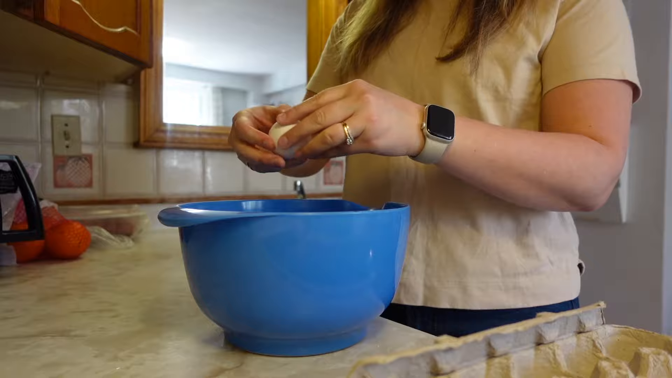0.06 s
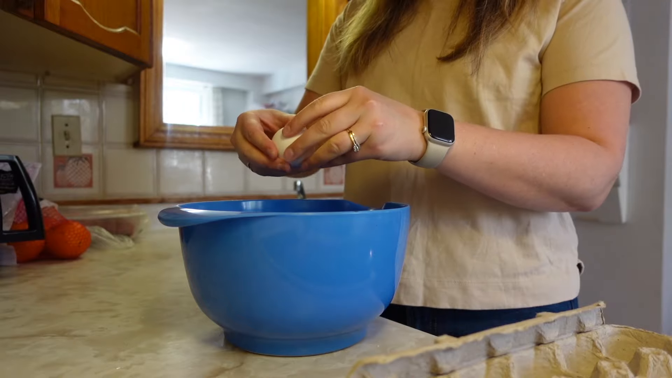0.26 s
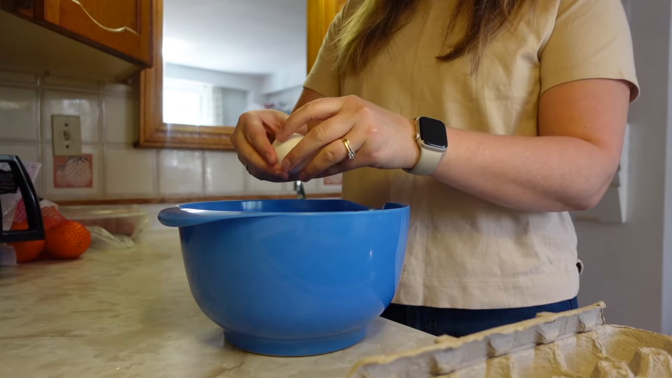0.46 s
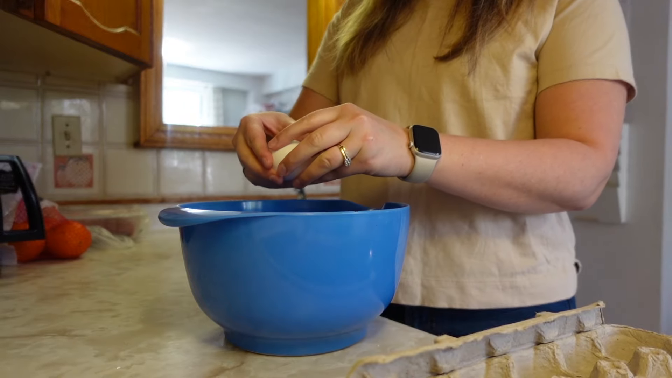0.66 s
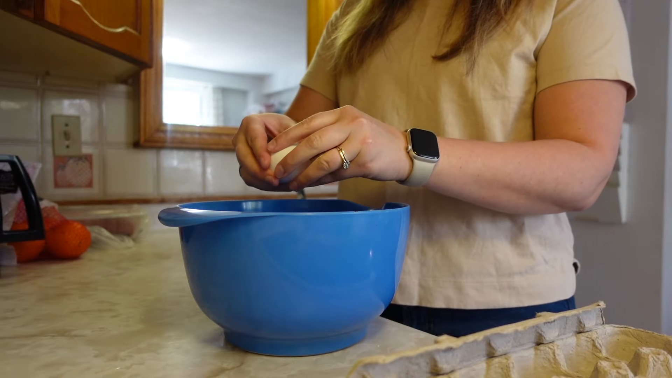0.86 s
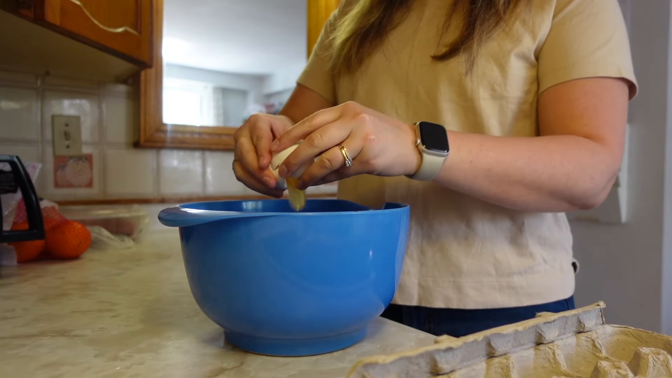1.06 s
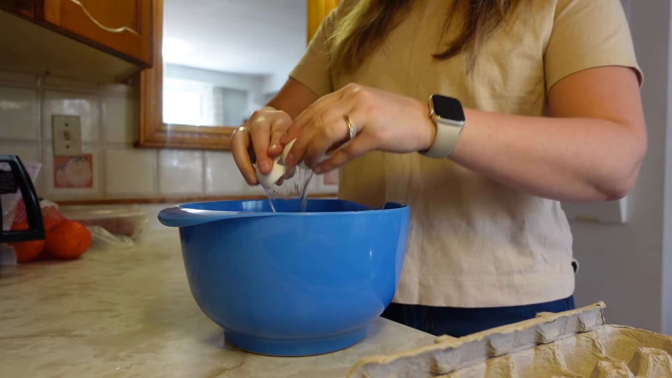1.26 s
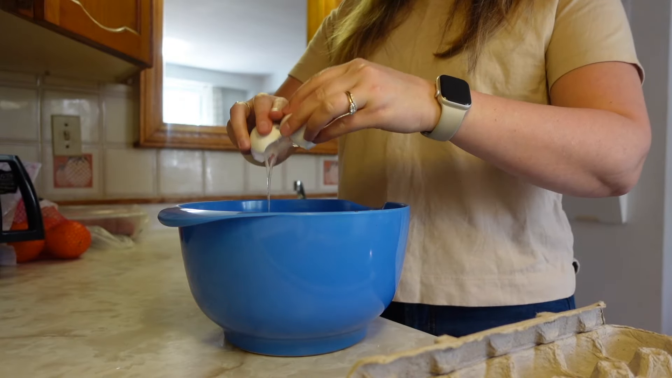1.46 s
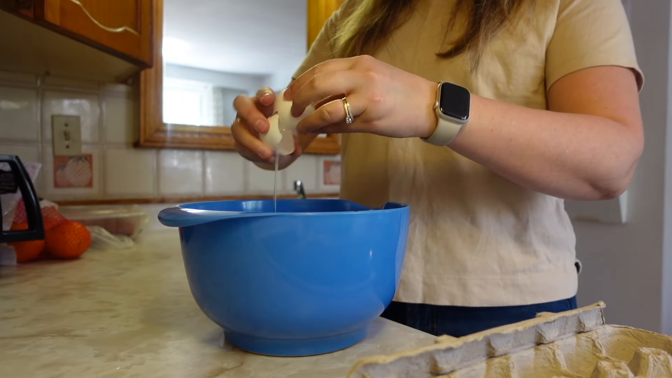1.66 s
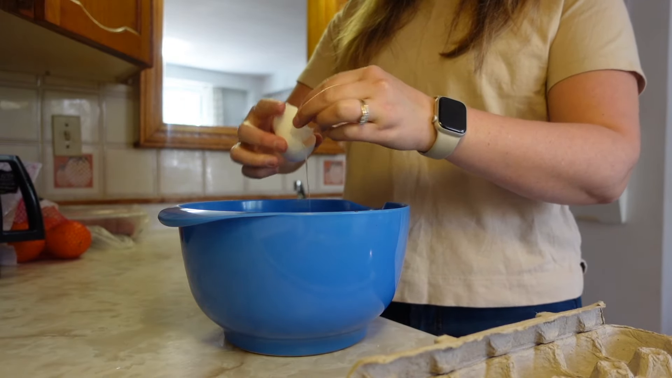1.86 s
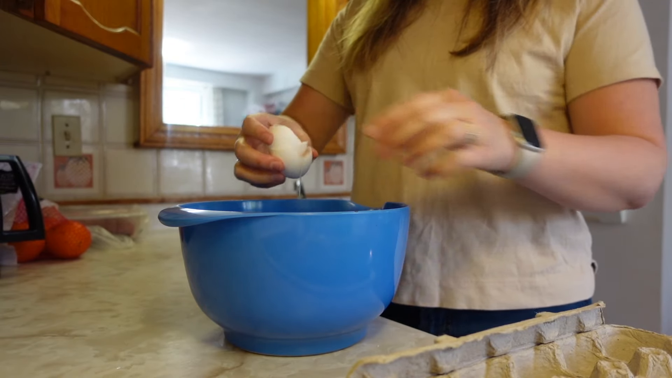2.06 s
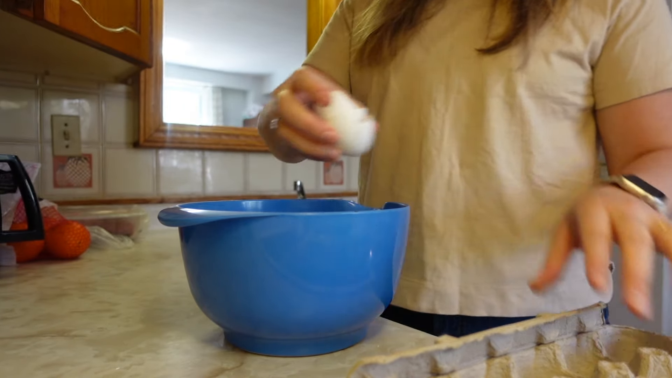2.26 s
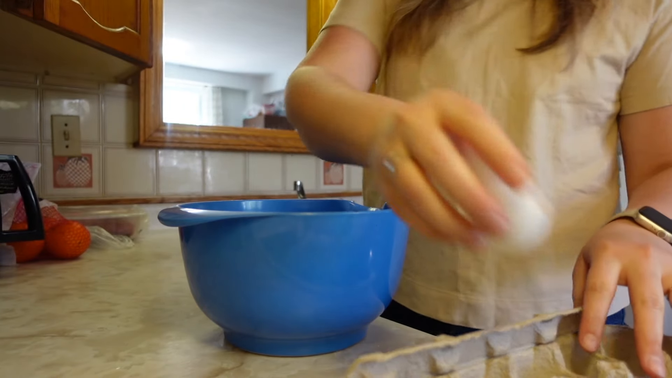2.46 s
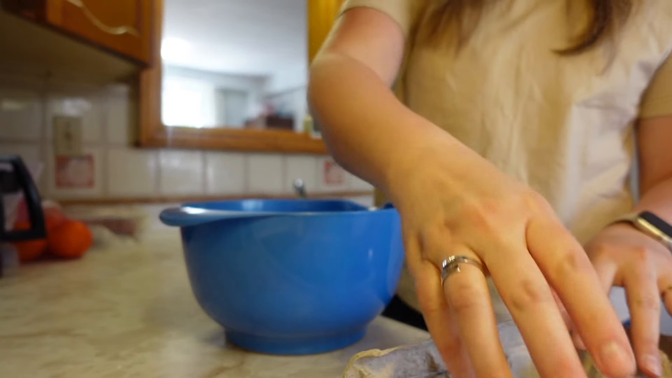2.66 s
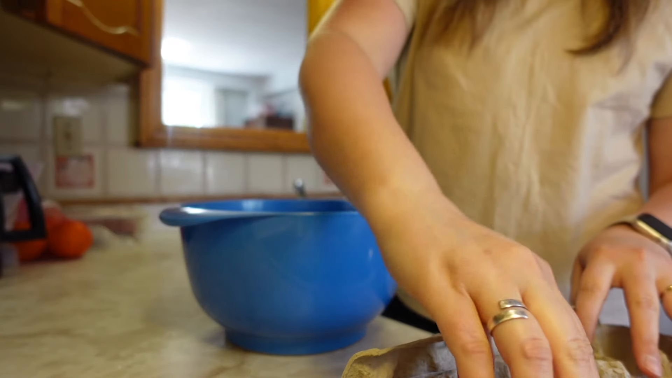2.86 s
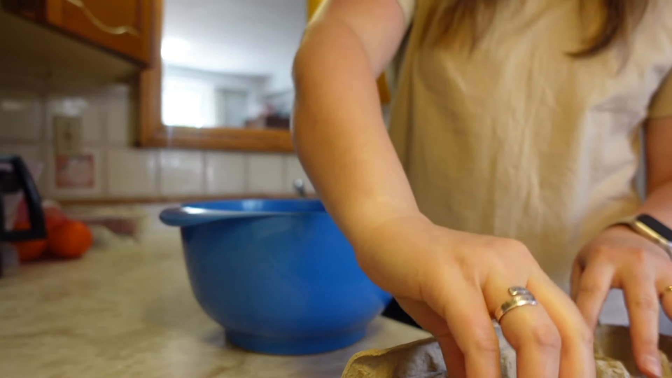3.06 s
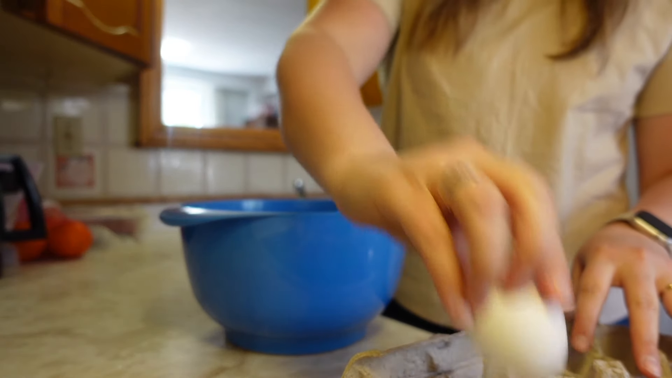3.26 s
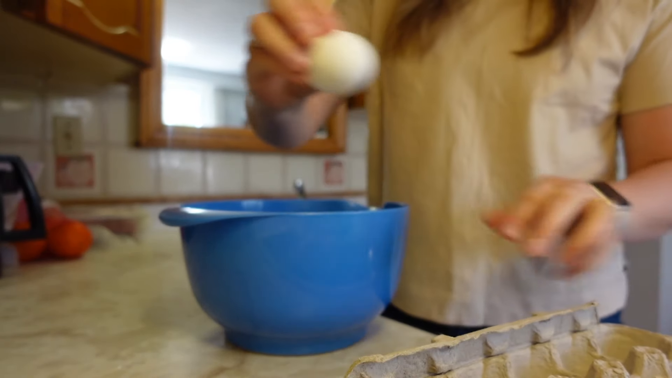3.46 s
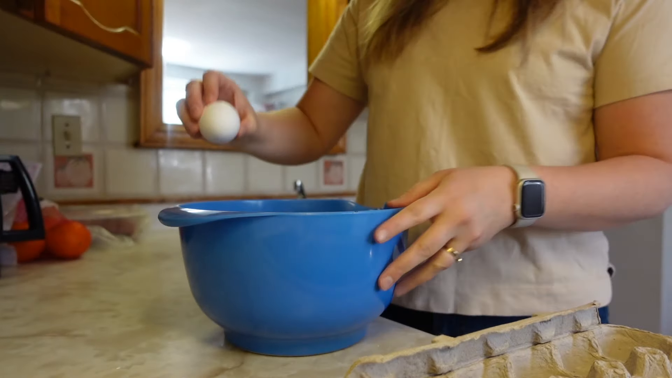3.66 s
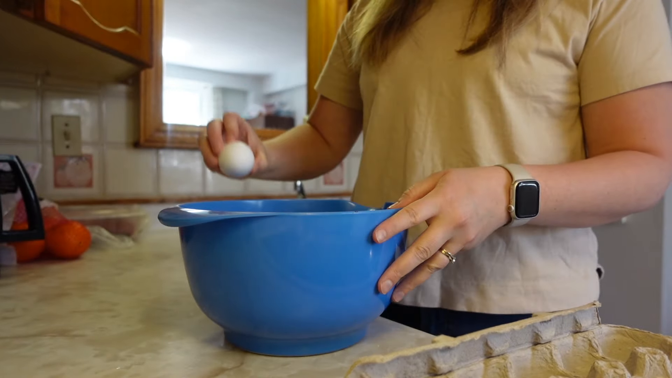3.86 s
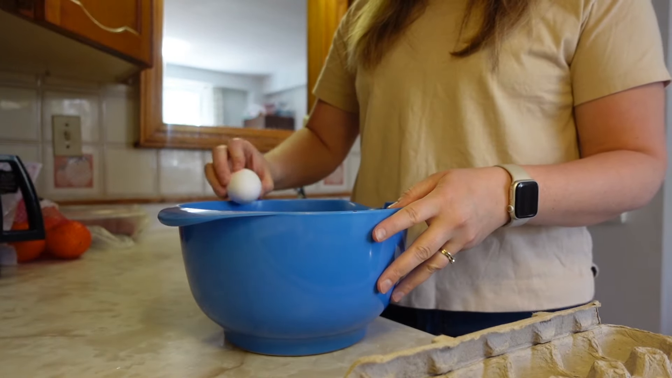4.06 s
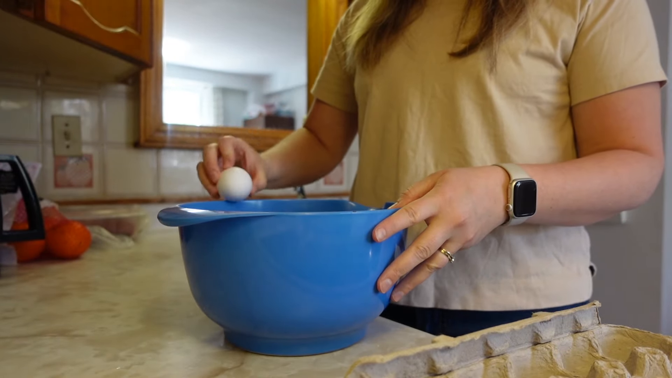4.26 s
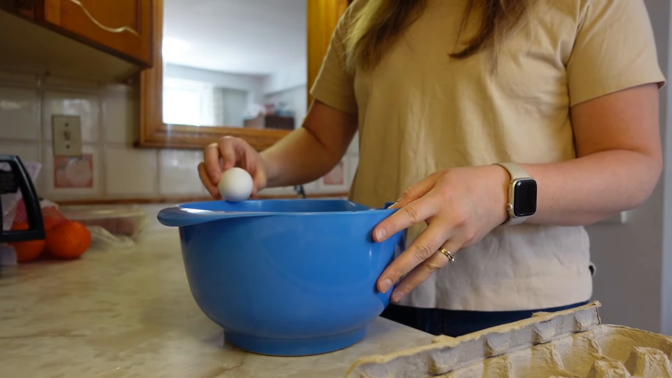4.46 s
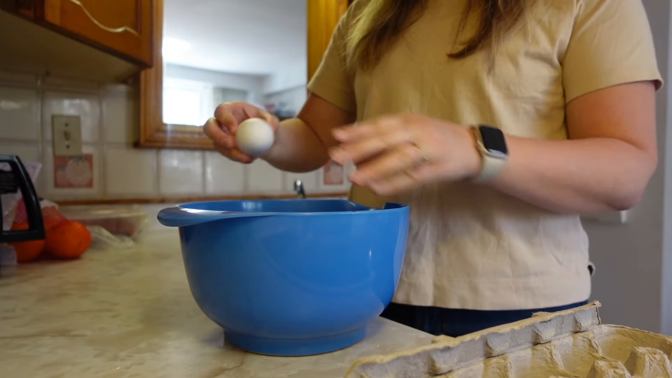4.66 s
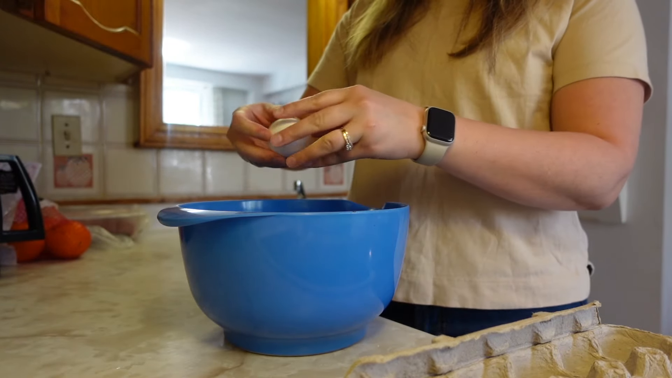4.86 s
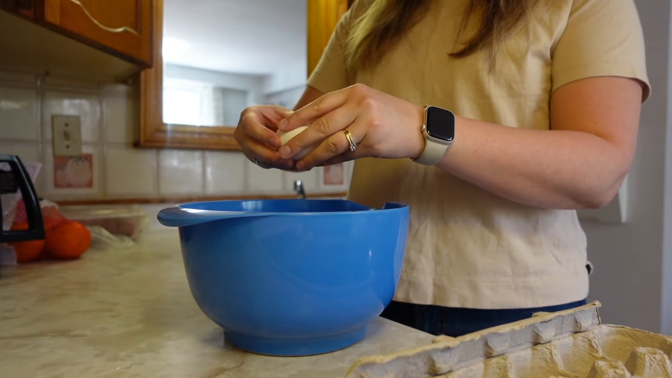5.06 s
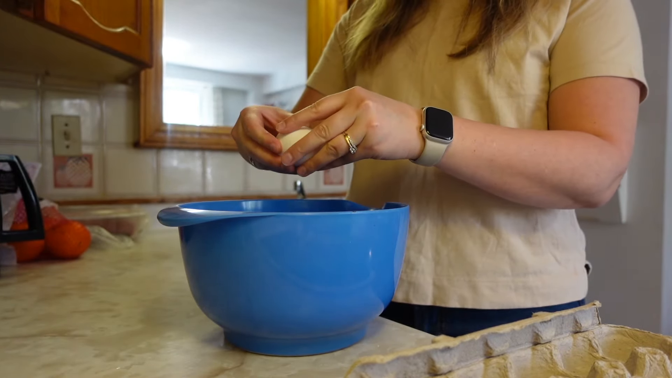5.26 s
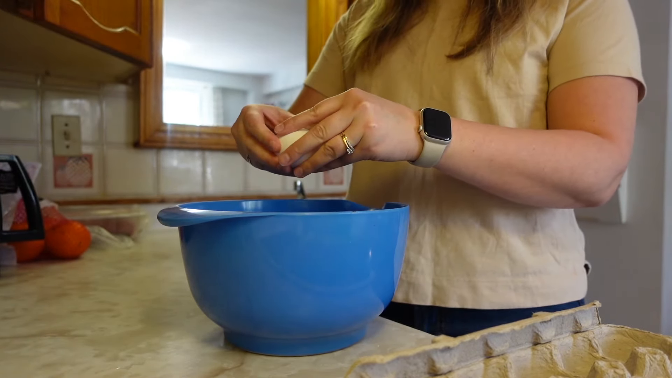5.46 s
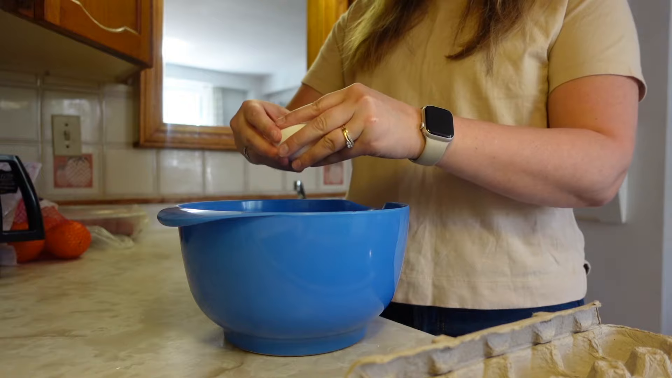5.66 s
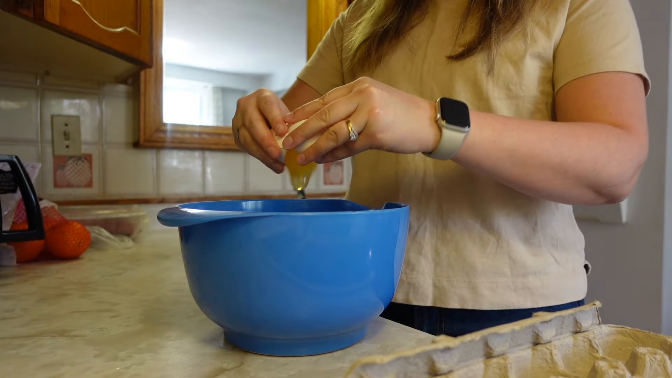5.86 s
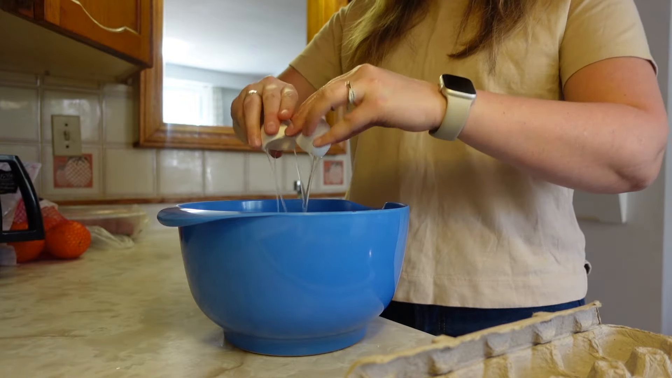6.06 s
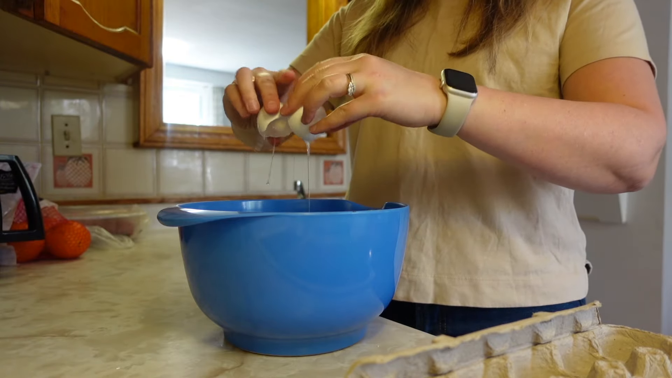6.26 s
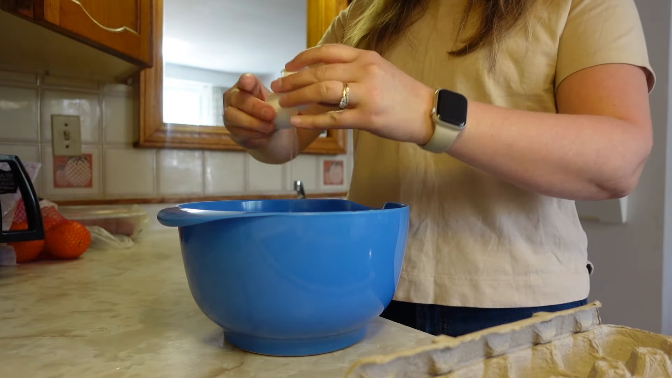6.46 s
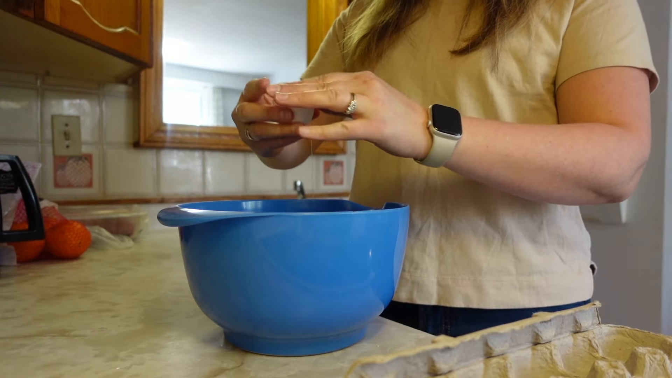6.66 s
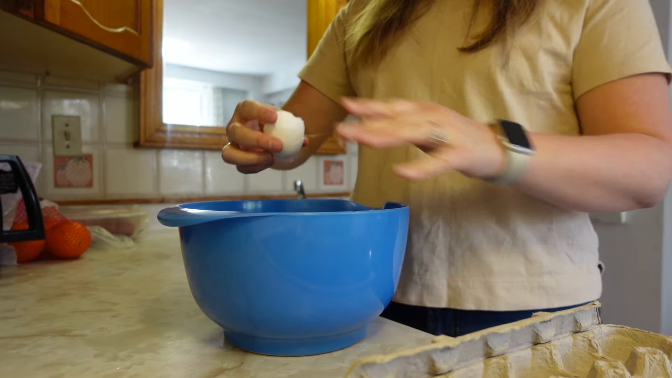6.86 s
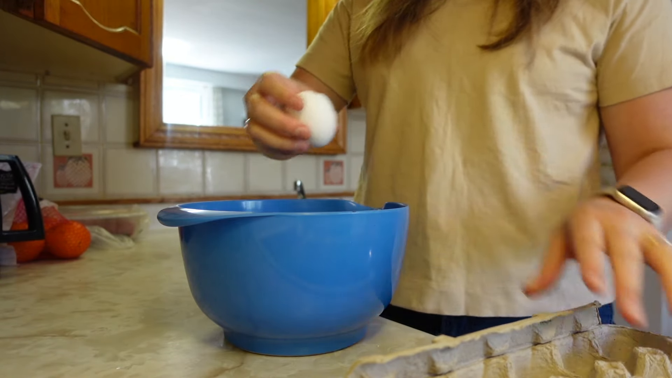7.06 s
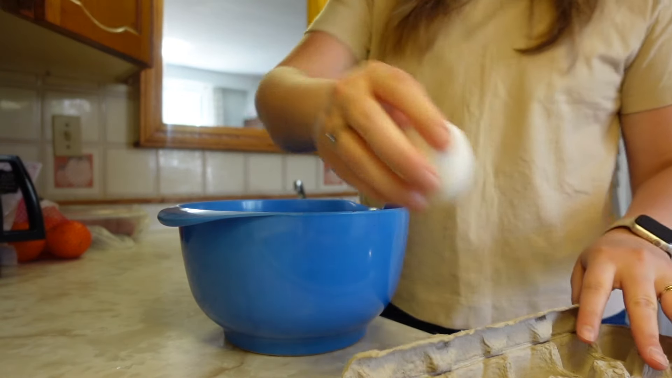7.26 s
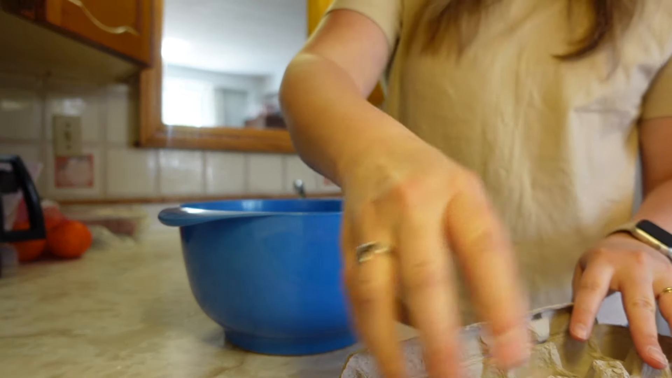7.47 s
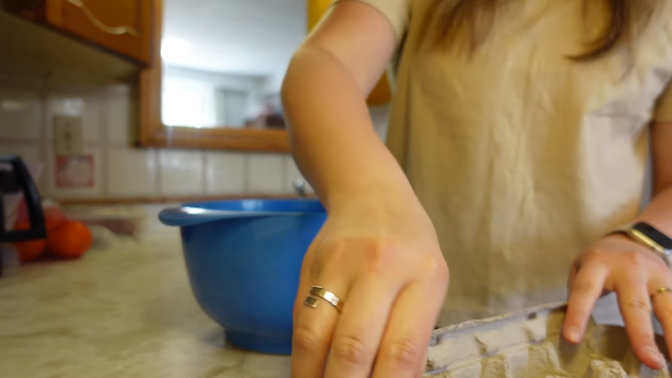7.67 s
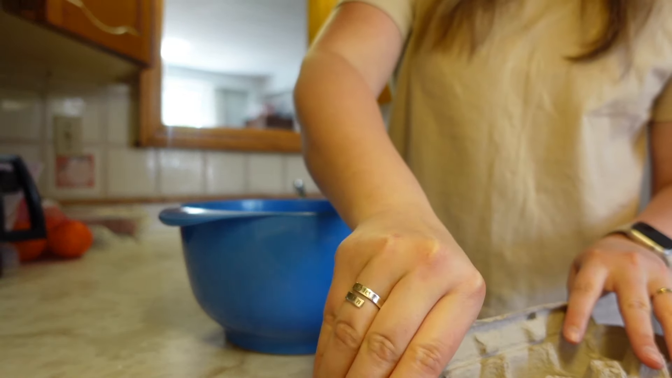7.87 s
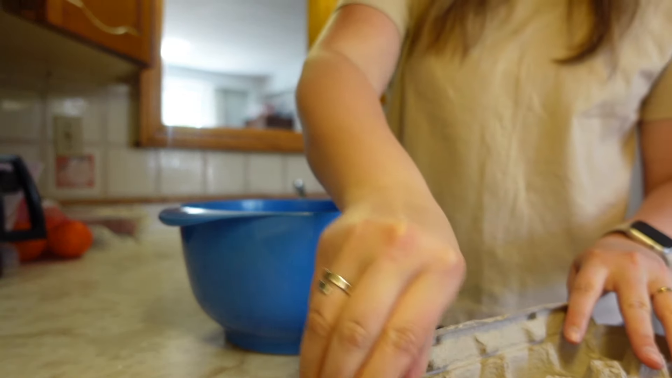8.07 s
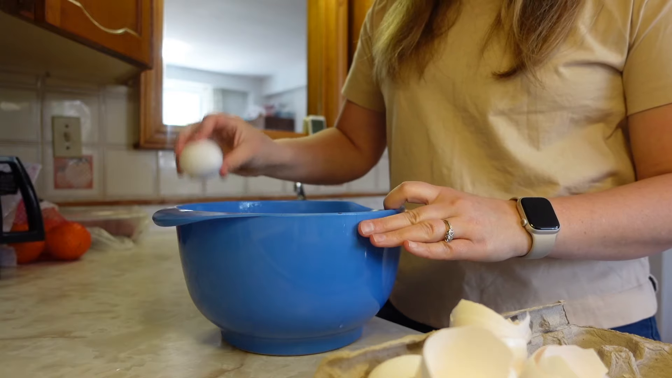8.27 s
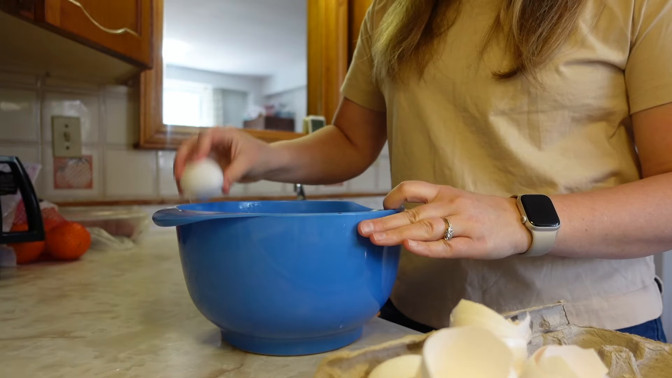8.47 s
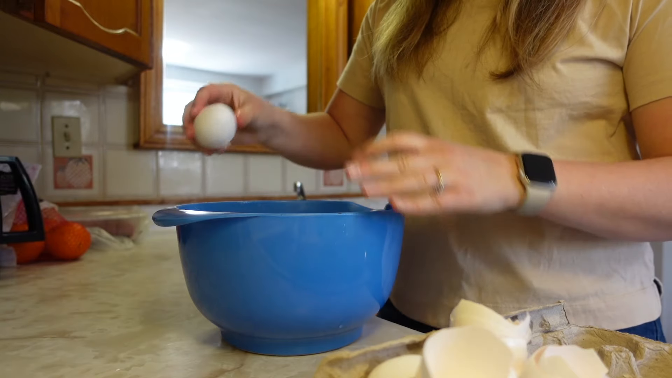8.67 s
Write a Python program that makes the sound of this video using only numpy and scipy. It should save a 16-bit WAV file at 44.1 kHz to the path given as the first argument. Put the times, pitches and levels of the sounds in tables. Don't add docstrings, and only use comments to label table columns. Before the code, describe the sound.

Close stereo sound of eggs being cracked in a hard-walled kitchen. Shell snaps and crunches apart with tiny wet pops, then drops into a pulp carton with dull knocks and fibrous rubbing. Three firm taps on a plastic bowl rim follow, and another egg is split with brittle crackles. Its shell lands in the carton, and the next egg is knocked on the rim. A low fridge hum runs underneath.

```python
import sys
import numpy as np
from scipy import signal
from scipy.fft import rfft, irfft, next_fast_len
from scipy.io import wavfile
from scipy.ndimage import uniform_filter1d, map_coordinates

SR = 44100
rng = np.random.default_rng(int(sys.argv[2]) if len(sys.argv) > 2 else 0)


def volts_from_decibels(level):
    exponent = np.asarray(level, float) / 20
    return 10 ** exponent


def unload_audio(sound):
    columns = np.transpose(np.atleast_2d(sound))
    steps = np.round(np.clip(columns, -1, 1) * 32767)
    wavfile.write(sys.argv[1], SR, steps.astype(np.int16))


N = 384111
SPAN = 3 * 2 ** 13
HZ = np.fft.rfftfreq(SPAN, 1 / SR)

# frequency in Hz, time to fall 60 dB in seconds.
KITCHEN_DECAY = [(100, 0.44), (500, 0.43), (1500, 0.56), (4000, 0.46), (8000, 0.39), (14000, 0.29)]
# frequency in Hz, left-right likeness [0-1].
ECHO_ALIKE = [(200, 1), (600, 0.95), (1600, 0.76), (5000, 0.72), (15000, 0.53)]

# frequency in Hz, level in dB rms.
MOTOR_LINES = [(60, -77), (120, -50.5), (150, -50), (249, -57), (469, -65.5)]
# frequency in Hz, level in dB per Hz.
DRONE_COLOUR = [(20, -40.5), (50, -25.5), (86, -19), (108, -15.5), (135, -5), (172, -6.5), (197, 0.5),
                (228, -3), (262, -3), (291, -12.5), (364, -8), (430, -15.5), (480, -19.5), (520, -25),
                (900, -61.5)]
# frequency in Hz, level in dB per Hz.
HISS_COLOUR = [(290, -39), (500, -5.5), (822, -10), (1020, -5.5), (1450, -17), (1790, -12), (2130, -18),
               (3020, -18.5), (3550, -19), (10500, -25), (16500, -34.5)]
# frequency in Hz, left-right likeness [0-1].
HISS_ALIKE = [(500, 0.17), (1600, 0.041), (5000, 0.093), (15000, 0.66)]
# start in seconds, length in seconds, frequency in Hz, level in dB.
RINGS = [(0, .44, 2930, -64), (0, .36, 2200, -69), (.08, .14, 5150, -69), (.07, .25, 5850, -71),
         (.6, .3, 1720, -65), (3.52, .13, 4800, -74), (8.112, .03, 5300, -63), (8.172, .055, 1980, -60),
         (8.14, .05, 740, -59), (6.15, .28, 1720, -60), (5.945, .17, 2820, -49), (3.385, .07, 4300, -66),
         (1.336, .08, 1030, -50)]

# start in seconds, peak in dB, hollow ring in dB, crumble in seconds.
SNAPS = [(0.4447, -27, -42.5, 0.043), (0.4936, -14, -48, 0.042), (0.9234, -14, -32.5, 0.05),
         (0.941, -15, -40, 0.054), (1.0318, -9.5, -32, 0.12), (1.0587, -6.5, -39, 0.013),
         (1.061, -18, -27, 0.08), (1.1459, -42, -28, 0.088), (1.1699, -19.5, -37, 0.045),
         (1.2744, -13, -46, 0.028), (1.3304, -21, -26.5, .047), (1.372, -20, -34.5, 0.053),
         (1.4374, -25.5, -54, 0.023), (1.6276, -22, -32.5, 0.046), (1.6893, -29, -30, 0.051),
         (1.709, -16.5, -27.5, 0.061), (1.7551, -16, -31, 0.082), (1.8193, -25.5, -33, .058),
         (1.855, -23.5, -32.5, .028), (5.7424, -16, -32, 0.14), (5.7887, -28, -34.5, 0.032),
         (5.881, -32, -59, .041), (5.9387, -19, -36, 0.03), (6.097, -31, -44, 0.047),
         (6.2348, -29, -48, .059), (6.2576, -20.5, -44, 0.058), (6.281, -21, -39, .044),
         (6.4446, -39, -52, 0.037), (6.4672, -44, -51, 0.038), (6.5265, -29, -42, 0.11)]
# start in seconds, peak in dB, hollow ring in dB, crumble in seconds.
CRUSHES = [(0.8774, -47, -75, .15), (1.51, -40, -44, 0.057), (1.5235, -29, -36, 0.18),
           (1.537, -22, -40, 0.074), (1.56, -21, -34.5, 0.04), (1.591, -18, -40, .03),
           (1.6654, -46, -40, 0.015), (1.722, -20.5, -38, .021), (1.884, -36, -44, 0.033),
           (1.9228, -36, -43, 0.028), (2.034, -29.5, -44, 0.087), (6.082, -48, -49, 0.044),
           (6.115, -26, -38, 0.074), (6.1926, -24.5, -43, 0.028), (6.205, -43, -41, 0.034),
           (6.2897, -17, -46, .04), (6.3035, -23, -36, 0.047), (6.5102, -32, -44, 0.046),
           (6.535, -41, -41, 0.6), (6.6175, -27.5, -38, 0.075), (6.6425, -19, -40, 0.049),
           (6.658, -25, -48, .032), (6.8694, -49, -55, 0.083)]
# start in seconds, hollow half shell in Hz, flake in Hz.
BREAK_PITCHES = [(0.4447, 3070, 8730), (0.4936, 2970, 7780), (0.8774, 1740, 9180), (0.9234, 3030, 9300),
                 (0.941, 2680, 3680), (1.0318, 1960, 6060), (1.059, 1730, 6580), (1.1459, 1720, 5900),
                 (1.1699, 1920, 6840), (1.2744, 1710, 6520), (1.3304, 1690, 3480), (1.372, 1770, 6600),
                 (1.4374, 2470, 5900), (1.5235, 2550, 6350), (1.537, 2340, 6230), (1.56, 2010, 3460),
                 (1.5911, 3070, 7040), (1.6276, 2320, 3640), (1.6654, 2030, 7530), (1.6903, 2000, 6570),
                 (1.709, 2320, 6490), (1.722, 2380, 9890), (1.7551, 2330, 6520), (1.8193, 2150, 6450),
                 (1.855, 2330, 3550), (1.884, 2310, 5960), (1.9228, 2360, 5780), (2.036, 2360, 8660),
                 (5.7424, 3080, 6020), (5.7887, 3220, 7010), (5.881, 3090, 4940), (5.9387, 2800, 3700),
                 (6.082, 2820, 3810), (6.097, 2820, 4930), (6.115, 2630, 10400), (6.1926, 1580, 6550),
                 (6.205, 3250, 3310), (6.2348, 1700, 7560), (6.2576, 3110, 6370), (6.281, 3110, 6400),
                 (6.2895, 3130, 6460), (6.3037, 2860, 6340), (6.4446, 2590, 6130), (6.4672, 2330, 8410),
                 (6.5104, 1870, 6470), (6.5265, 2160, 6050), (6.5676, 2930, 3330), (6.6172, 2250, 5600),
                 (6.6425, 1880, 8950), (6.6582, 2220, 8630), (6.8694, 1980, 6400)]
# start in seconds, peak in dB.
TICKS = [(0.391, -55), (0.4334, -41), (0.6174, -43), (0.6574, -48.5), (0.7003, -45), (1.235, -55),
         (4.9561, -50), (5.0799, -49), (5.0898, -47), (5.2704, -47.5), (5.414, -43.5), (5.455, -47),
         (5.5892, -51.5), (5.6568, -43.5), (5.713, -46), (6.9404, -61.5), (.477, -41), (5.728, -38)]
# start in seconds, peak in dB, frequency in Hz, width in Hz.
POPS = [(.5, -42.5, 513, 80), (.93, -26, 2840, 120), (1.332, -33.5, 1083, 121), (1.345, -33, 1360, 200),
        (5.932, -24, 3500, 450), (5.94, -28, 2806, 70), (6.2, -41.5, 1640, 121.5), (6.12, -40, 1900, 250),
        (6.646, -31, 1892, 170), (1.036, -26, 6200, 600), (1.274, -23, 5400, 1200),
        (1.33, -25.5, 5060, 600), (1.33, -33, 3500, 600), (1.535, -37, 2390, 250), (1.54, -36, 4300, 600),
        (1.562, -33, 3420, 250), (1.59, -35.5, 1750, 300), (1.545, -38.5, 1490, 250),
        (1.855, -39, 3530, 250), (5.94, -26, 3950, 350), (6.08, -43, 1750, 200), (6.203, -32.5, 3220, 200),
        (6.203, -40, 4100, 250), (6.255, -45, 1770, 250), (6.292, -36.5, 3120, 150),
        (6.305, -42, 3500, 180), (6.3, -49, 4430, 300), (6.3, -42, 1730, 250), (6.846, -37, 9250, 1500),
        (2.662, -25.5, 2300, 200), (2.679, -20.5, 750, 160), (7.528, -23, 5300, 700),
        (7.536, -22, 6300, 900), (7.583, -22.5, 2800, 350), (7.585, -17.5, 5300, 700)]
# frequency in Hz, level in dB per Hz.
SHELL_COLOUR = [(410, -50), (700, -19), (1200, -18), (3000, -11), (3850, -6), (6370, -2.5), (12200, -3.5),
                (15400, -10), (16500, -47)]

# time in seconds, pressure in dB.
PRISING = [
    [(.85, -61), (.93, -43), (1.1, -40.5), (1.21, -45), (1.4, -60), (1.72, -49), (1.77, -53), (1.9, -66),
     (2.15, -61)],
    [(5.6, -90), (5.72, -56), (5.91, -44.5), (5.96, -50), (6.16, -63), (6.32, -74), (6.5, -50), (6.57, -48),
     (7, -69.5)],
]
# time in seconds, pitch in Hz.
CAVITY_PITCH = [
    [(.93, 2980), (1.06, 1830), (1.15, 1710), (1.37, 1790), (1.44, 1410), (1.55, 2426), (1.63, 2310),
     (1.69, 2010), (1.76, 2284)],
    [(5.74, 3350), (5.94, 3460), (6.08, 2780), (6.13, 3350), (6.3, 3150), (6.46, 2400), (6.51, 2030),
     (6.57, 2510), (6.65, 1950)],
]
# start in seconds, hold in seconds, fade in seconds per 20 dB,
# level in dB, dull over bright in dB.
RUBS = [(2.406, 0.02, 0.17, -56.5, 4.5), (2.47, 0.0084, 1.5, -65.5, -1), (2.973, 0.068, 0.15, -41.5, -2.5),
        (3.078, 0.039, 0.16, -50.5, -5.5), (3.172, 0.039, 0.11, -50.5, -3), (3.35, 0.0082, 0.12, -53, 1.5),
        (3.391, 0.012, 0.01, -53, 0), (3.429, .01, 0.44, -66.5, 2), (3.719, 0.016, 0.02, -51, -25),
        (7.221, .005, 0.26, -59.5, 1), (7.638, .005, 0.12, -53.5, 15), (7.731, 0.062, 0.06, -41.5, -10),
        (7.831, 0.11, .03, -39.5, -3.5), (7.97, .02, 0.27, -57, 3), (8.053, .005, 0.06, -54.5, -6),
        (8.136, 0.0047, 0, -56.5, -8)]

# start in seconds, peak in dB, bright part in dB, crumble in seconds.
DROPS = [
    (2.6571, -11, -4, 0.047),
    (2.678, -10.5, -9.5, 0.033),
    (2.885, -48, 8.5, 0.073),
    (7.514, -9.5, -12.5, 0.062),
    (7.528, -20, -1, 0.089),
    (7.581, -21, -1.5, 0.051),
    (7.603, -16.5, 0.5, 0.028),
    (7.646, -15, -9.5, 0.037),
    (8.004, -36, -14, 0.041),
    (8.131, -49, -8, 0.048),
]
# frequency in Hz, width in Hz, level in dB.
CUPS = [
    (1690, 380, -8.5),
    (944, 200, 1.5),
]
# frequency in Hz, level in dB per Hz.
PULP_COLOUR = [(150, -57), (250, -1.5), (628, -2.5), (749, 0), (1080, -0.5), (1160, -3.5), (1720, 1.5),
               (2160, -6.5), (2600, -11.5), (3380, -19), (7000, -45)]
# frequency in Hz, level in dB per Hz.
FIBRE_COLOUR = [(1180, -36.5), (2000, -5), (2770, -7.5), (3480, -2.5), (4090, -7.5), (4920, -4),
                (13300, -15), (16100, -24), (16500, -53)]
# start in seconds, length in seconds, peak in dB,
# frequency in Hz, width in Hz.
CHAFES = [(2.972, .09, -34.5, 3480, 350), (2.985, .065, -35, 1950, 130), (2.99, .07, -42.5, 7080, 150),
          (3.07, .07, -40, 3480, 250), (3.07, .055, -43.5, 6850, 350), (3.08, .06, -48, 1920, 250),
          (3.163, .07, -42.5, 5650, 180), (3.168, .065, -45, 3370, 300), (3.168, .065, -43, 1650, 300),
          (3.385, .035, -43, 1650, 200), (7.725, .055, -35, 1900, 300), (7.735, .045, -38, 3200, 298),
          (7.735, .045, -38, 5300, 300), (7.82, .03, -37, 3830, 200), (7.87, .085, -34.5, 4250, 700),
          (7.905, .048, -34.5, 3400, 250), (7.85, .1, -34, 1280, 200), (7.905, .045, -36, 7100, 900)]

# start in seconds, peak in dB, bowl body in dB, rattle in seconds, rise in seconds.
KNOCKS = [
    (4.0892, -7.5, -14.5, 0.062, 0.0021),
    (4.2842, -9, -20, 0.045, 0.003),
    (4.466, -4, -32.5, 0.019, 0.0011),
    (8.3482, -8, -21.5, 0.2, 0.00027),
    (8.39, -13.5, -30, .06, .006),
    (8.526, -7.5, -29, 0.059, 0.0044),
    (8.563, -15.5, -31, 0.042, .004),
]
# frequency in Hz, level in dB per Hz.
RIM_COLOUR = [(760, -55.5), (1300, -14), (1900, -10.5), (2450, -12), (3000, -2.5), (4000, -3.5), (5000, -5),
              (7000, -5), (15200, -18), (16000, -38.5), (16500, -57)]
# frequency in Hz, level in dB per Hz.
BOWL_COLOUR = [(160, -26.5), (280, -4), (389, -4.5), (466, -3.5), (630, -11.5), (852, -13.5), (961, -7),
               (1050, -10), (1490, -18.5), (2200, -24), (2860, -27), (4840, -120)]
# frequency in Hz, width in Hz, level in dB.
RIM_SPOTS = [
    [(940, 60, -7), (1730, 90, -19.5)],
    [(1095, 36, 13.5), (1830, 210, 27)],
]
# frequency in Hz, width in Hz, level in dB.
RIM_MODES = [
    [(2800, 46, 6), (3170, 90, 11), (3500, 55, 4.5), (3720, 50, 9), (4010, 80, 0.0), (4770, 80, 8),
     (5330, 45, 5), (7105, 69, 7.5)],
    [(1947, 40, 7.5), (3285, 70, 10), (2690, 63, 3.5), (4060, 66, 9), (5300, 120, 3), (5960, 71, 8.5),
     (8200, 70, 5)],
]
# start in seconds, peak in dB, frequency in Hz, width in Hz.
RIM_RING = [(4.093, -19, 3120, 360), (4.288, -28, 2800, 140), (4.288, -32, 3840, 100),
            (4.468, -15, 3170, 120), (4.468, -26, 3900, 250), (4.47, -21, 5050, 253),
            (4.47, -28.5, 1020, 200), (4.47, -35.5, 2110, 300), (8.352, -29.5, 3285, 60),
            (8.352, -27, 734, 17), (8.528, -23, 3280, 70), (8.53, -23, 4300, 250), (8.53, -40, 735, 22)]
# start in seconds, peak in dB, push in seconds.
THUMPS = [
    (1.33, -35, 0.0088),
    (2.66, -32.5, 0.0092),
    (4.095, -19, 0.013),
    (4.29, -17, 0.009),
    (4.472, -23.5, 0.0128),
    (7.52, -38, 0.0096),
    (8.353, -26, 0.014),
    (8.532, -35, 0.0099),
]
# frequency in Hz, width in Hz, level in dB.
COUNTER_MODES = [(84.2, 6.2, -5.5), (110, 11, 2.5), (187.5, 21.4, 12.5), (228, 25, -0.5), (290, 30, -4),
                 (365, 30, -16)]


def unit(x):
    return x / np.sqrt(np.mean(x ** 2) + 1e-20)


def along(points, hz):
    f, v = np.transpose(points)
    return np.interp(np.log(hz + 1), np.log(f + 1), v)


def modes(table, f):
    total = 0
    for k, (centre, width, db) in enumerate(table):
        damping = 1j * f * width
        total = total + (-1) ** k * volts_from_decibels(db) * damping / (centre * centre - f * f + damping + 1e-9)
    return total


def causal(points):
    cepstrum = irfft(np.log(volts_from_decibels(along(points, HZ)) + 1e-5))
    cepstrum[1:SPAN // 2] *= 2
    cepstrum[SPAN // 2 + 1:] = 0
    return np.exp(rfft(cepstrum))


def stereo(pair, spectrum, alike):
    size = next_fast_len(pair.shape[-1])
    hz = np.fft.rfftfreq(size, 1 / SR)
    turn = np.arccos(np.clip(along(alike, hz), -1, 1)) / 2
    coloured = rfft(pair, size) * volts_from_decibels(along(spectrum, hz))
    mid, side = irfft(coloured * [np.cos(turn), np.sin(turn)], size)
    return np.array([mid + side, mid - side])


def wobble(rate):
    at = np.arange(0, N + 32, 32)
    knots = rng.standard_normal(int(N * rate / SR) + 4)
    return np.interp(np.arange(N), at, map_coordinates(knots, [at * rate / SR]))


def narrow(hz, width_hz):
    slow = rng.standard_normal((2, N)) + 1j * rng.standard_normal((2, N))
    slow = signal.lfilter([1], [1, -np.exp(-np.pi * width_hz / SR)], slow)
    mid, side = np.real(slow * np.exp(2j * np.pi * np.cumsum(hz + np.zeros(N)) / SR))
    return unit(np.array([mid + 0.73 * side, mid - 0.63 * side]))


def echo():
    hz, t, z = signal.stft(rng.standard_normal((2, SR // 2)), SR, nperseg=256)
    decay = volts_from_decibels(-60 * t / along(KITCHEN_DECAY, hz)[:, None])
    tail = signal.istft(z * decay, SR, nperseg=256)[1]
    tail = stereo(tail, [(20, 0), (20000, 0)], ECHO_ALIKE)
    first_wall = round(.004 * SR)
    return rfft(np.pad(tail / np.linalg.norm(tail[0]), ((0, 0), (first_wall, 0))), SPAN)


def even(x, shape):
    z = rfft(x)
    flat = irfft(z / (np.abs(z) + .1 * np.abs(z).mean()))
    return shape * flat / np.sqrt(np.abs(uniform_filter1d(flat ** 2, size=10)) + 1e-20)


def crumble(last, spiky_db, rise, lead=0):
    t = np.arange(SPAN // 4) / SR
    sizes = volts_from_decibels(spiky_db * rng.exponential(size=len(t))) * (1 + lead * np.exp(-t / 0.00026))
    shape = sizes * volts_from_decibels(-60 * t / max(last, .002)) * (1 - np.exp(-t / max(rise, 1e-4)))
    return even(rng.standard_normal(len(t)) * shape, shape)


def peaked(force, response, db):
    x = irfft(rfft(force, SPAN) * response)
    return volts_from_decibels(db) * x / np.abs(x).max()


def add(out, s, dry, pan_db, wet, duck_db=0):
    direct = dry * volts_from_decibels([[pan_db / 2], [-pan_db / 2]])
    walls = irfft(rfft(dry) * wet) * volts_from_decibels([[0.15 * pan_db], [-.2 * pan_db]])
    gain = volts_from_decibels(-duck_db * np.exp(-np.arange(SPAN) / (0.035 * SR)))
    out[:, round(s * SR):][:, :SPAN] += (direct + walls) * gain


def alone(table):
    return np.diff(np.transpose(table)[0], prepend=0) > 1


def fridge():
    t, shape = np.arange(N) / SR, (2, next_fast_len(N))
    lines = 0
    for hz, db in MOTOR_LINES:
        level = np.sqrt(2) * volts_from_decibels(db + 1.1 * wobble(2.4))
        lines = lines + level * np.sin(2 * np.pi * hz * t + 0.75 * wobble(2.51))
    drone_alike = [(150, .999), (300, 0.98), (600, 0.81)]  # Hz, left-right likeness
    drone = stereo(rng.standard_normal(shape), DRONE_COLOUR, drone_alike)[:, :N]
    hiss = stereo(rng.standard_normal(shape), HISS_COLOUR, HISS_ALIKE)[:, :N]
    drone_gain = volts_from_decibels(-47.5 + 0.81 * wobble(1.655))
    hiss_gain = volts_from_decibels(-63.5 + 0.23 * wobble(0.54))
    return lines + drone_gain * unit(drone) + hiss_gain * unit(hiss)


def rings():
    out, waver = np.zeros((2, N)), .8 + .45 * narrow(0, width_hz=90)
    for s, last, hz, db in RINGS:
        t, start = np.arange(round(last * SR)) / SR, round(s * SR)
        swell = np.minimum(1, (s == 0) + t / .012)
        tone = volts_from_decibels(db) * np.sqrt(1 - t / last) * swell * np.sin(2 * np.pi * hz * t)
        out[:, start:][:, :len(t)] += tone * waver[:, start:][:, :len(t)]
    return out


def snaps(echoes):
    out, bright = np.zeros((2, N + SPAN)), causal(SHELL_COLOUR)
    for k, (s, db, ring_db, last) in enumerate(SNAPS + CRUSHES):
        sharp = k < len(SNAPS)
        _, ring_hz, flake_hz = min(BREAK_PITCHES, key=lambda row: abs(row[0] - s))
        flake = bright * (1 + modes([(flake_hz, 0.082 * flake_hz, 7.0)], HZ))
        if sharp:
            lead = 2.2 * (0.031 / last) ** 2
            force = crumble(last, spiky_db=3.0, rise=0.00018, lead=lead)
        else:
            force = crumble(last, spiky_db=2.5, rise=0.0044)
        ring_width = (.08 if sharp else .12) * ring_hz
        ring = modes([(ring_hz, ring_width, 0), (1.5 * ring_hz, 0.49 * ring_hz, -15)], HZ)
        ring = ring * HZ ** 2 / ((.75 * ring_hz) ** 2 - HZ ** 2 + 1j * HZ * ring_hz)
        dry = peaked(force, flake, db + 0.16) + peaked(force, ring, ring_db + 3.5)
        add(out, s, dry, 2.6, volts_from_decibels(-8.5) * echoes[k % len(echoes)])
    hairline_cracks(out, bright, echoes)
    resonant_pops(out, echoes)
    return out[:, :N]


def hairline_cracks(out, bright, echoes):
    for k, (s, db) in enumerate(TICKS):
        tick = peaked(crumble(0.044, spiky_db=2.0, rise=0.00087), bright, db - 2.5)
        add(out, s, tick, 2.2, volts_from_decibels(-2.5) * echoes[k % len(echoes)])


def resonant_pops(out, echoes):
    for k, (s, db, hz, width_hz) in enumerate(POPS):
        force = crumble(0.032, spiky_db=1.5, rise=0.0023)
        pop = peaked(force, modes([(hz, 1.5 * width_hz, 0)], HZ) ** 2, db)
        add(out, s, pop, 1.5, volts_from_decibels(-7.5) * echoes[-k % len(echoes)])


def track(spans, rest):
    t, value = np.arange(N) / SR, np.full(N, float(rest))
    for s, level in map(np.transpose, spans):
        inside = (t >= s[0]) & (t <= s[-1])
        value[inside] = np.interp(t[inside], s, level)
    return value


def grains(spectrum, spiky_db, clump_db, alike):
    raw = rng.standard_normal((2, N)) * volts_from_decibels(spiky_db * rng.exponential(size=N))
    z = signal.stft(raw, nperseg=256)[2]
    field = uniform_filter1d(rng.standard_normal(z.shape[1:]), size=4, axis=0)
    field = uniform_filter1d(field, size=7, axis=1)
    raw = signal.istft(z * volts_from_decibels(clump_db * unit(field)), nperseg=256)[1]
    return unit(stereo(raw, spectrum, [(1000, alike)])[:, :N] * volts_from_decibels(1.9 * wobble(70)))


def cavity_hz(s):
    return np.interp(s, *np.concatenate(CAVITY_PITCH).T)


def strokes():
    bright, dull = np.zeros((2, N))
    rise_s = 0.019
    for s, hold, fade, db, dull_db in RUBS:
        start = round(s * SR) - SR // 10
        t = np.arange(start, min(start + SR, N)) / SR - s
        slope = np.minimum(t / rise_s, (hold - t) / fade)
        gain = volts_from_decibels(db + 20 * np.minimum(0, slope))
        bright[start:start + SR] += gain
        dull[start:start + SR] += gain * volts_from_decibels(dull_db)
    return bright, dull


def rubbing():
    bright, dull = strokes()
    dull = dull * grains(PULP_COLOUR, spiky_db=1.5, clump_db=3.5, alike=0.89)
    bright = bright * grains(FIBRE_COLOUR, spiky_db=1.5, clump_db=2.0, alike=0.86)
    edges = grains(SHELL_COLOUR, spiky_db=3, clump_db=4.5, alike=.7)
    cavity = narrow(cavity_hz(np.arange(N) / SR), width_hz=330) * volts_from_decibels(3.5 * wobble(70))
    pressure = volts_from_decibels(track(PRISING, rest=-200) - 7.5)
    return dull + bright + pressure * (edges + volts_from_decibels(-8) * cavity)


def drops(echoes):
    out, dull, bright = np.zeros((2, N + SPAN)), causal(PULP_COLOUR), causal(FIBRE_COLOUR)
    for k, ((s, db, bright_db, last), first) in enumerate(zip(DROPS, alone(DROPS))):
        rise, dip_db = (0.0011, 3.5) if first else (0.0031, -1)
        force = crumble(last, spiky_db=2.0, rise=rise)
        cup = dull * (1 + modes([CUPS[int(s > 6)]], HZ))
        dry = peaked(force, cup, db - 3.0) + peaked(force, bright, db + bright_db + 2.5)
        add(out, s, dry, -.3, volts_from_decibels(-3.0) * echoes[-k], dip_db)
    return out[:, :N]


def chafes(echoes):
    out = np.zeros((2, N + SPAN))
    for k, (s, last, db, hz, width_hz) in enumerate(CHAFES):
        force = rng.standard_normal(SR // 8)[:round(last * SR)]
        force = force * signal.windows.tukey(len(force), .4)
        chafe = peaked(force, modes([(hz, 1.55 * width_hz, 0)], HZ) ** 2, db)
        add(out, s, chafe, -.2, volts_from_decibels(-12) * echoes[-k % len(echoes)])
    return out[:, :N]


def knocks(echoes):
    out, rim, bowl = np.zeros((2, N + SPAN)), causal(RIM_COLOUR), causal(BOWL_COLOUR)
    for k, ((s, db, body_db, last, rise), first) in enumerate(zip(KNOCKS, alone(KNOCKS))):
        egg = int(s > 6)
        force = crumble(last, spiky_db=0.0, rise=rise)
        crack = peaked(force, rim * (1 + modes(RIM_MODES[egg], HZ)), db - 3)
        boom = peaked(force, bowl * (1 + modes(RIM_SPOTS[egg], HZ)), db + body_db + 10.5)
        dip_db = 11 if first else -0.5
        add(out, s, crack + boom, 1.6, volts_from_decibels(1.0) * echoes[-1 - k], dip_db)
    for k, (s, db, hz, width_hz) in enumerate(RIM_RING):
        ring = peaked(crumble(0.059, spiky_db=-0.5, rise=0.0016), modes([(hz, width_hz, 0)], HZ), db)
        add(out, s, ring, 1.2, volts_from_decibels(-0.8) * echoes[-k])
    counter_thumps(out, echoes)
    return out[:, :N]


def counter_thumps(out, echoes):
    mic_bass_cut = (1j * HZ / (95 + 1j * HZ)) ** 4
    slab = modes(COUNTER_MODES, HZ) * mic_bass_cut
    for k, (s, db, push) in enumerate(THUMPS):
        add(out, s, peaked(signal.windows.hann(round(push * SR)), slab, db), 0, volts_from_decibels(-5) * echoes[-k])


def scene():
    echoes = [echo() for _ in range(13)]
    steady = fridge() + rings()
    shells = snaps(echoes) + rubbing()
    carton = drops(echoes) + chafes(echoes)
    return steady + shells + carton + knocks(echoes)


def top_cut(x):
    return signal.sosfilt(signal.butter(12, 16990, fs=SR, output="sos"), x)


def record(dry):
    top_hz = 16990
    size = next_fast_len(N)
    passed = np.fft.rfftfreq(size, 1 / SR) < top_hz
    mix = irfft(rfft(dry, size) * passed, size)[:, :N]
    return top_cut(mix)


dry = scene()
out = record(dry)
unload_audio(out)
```